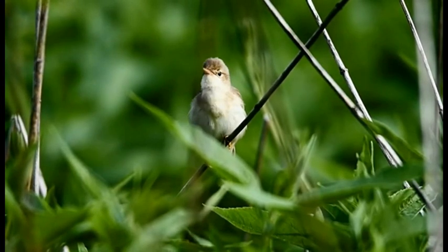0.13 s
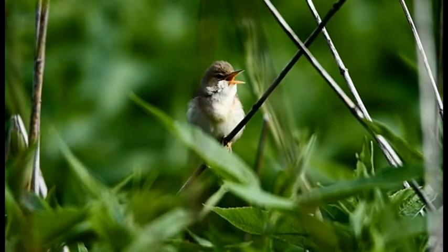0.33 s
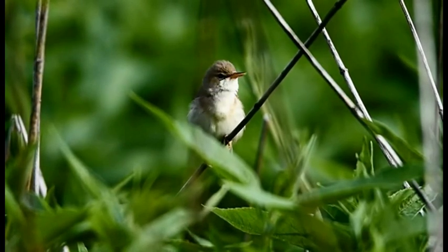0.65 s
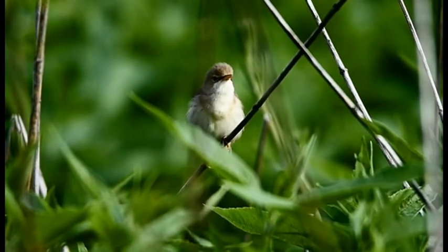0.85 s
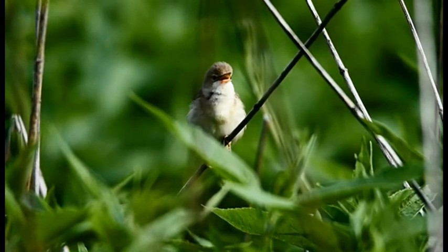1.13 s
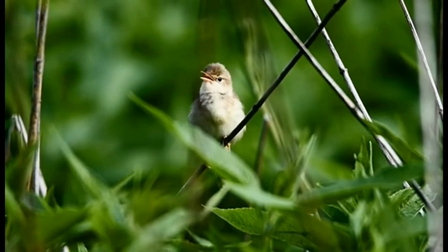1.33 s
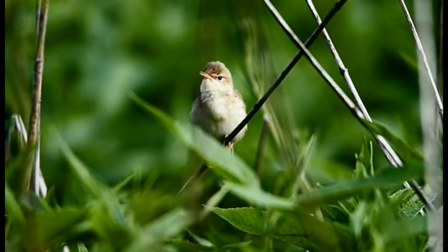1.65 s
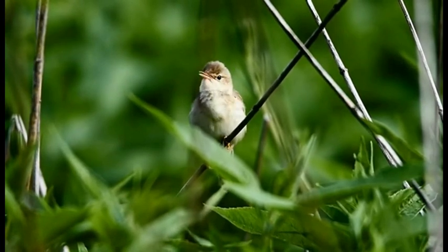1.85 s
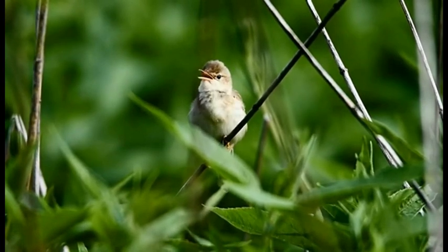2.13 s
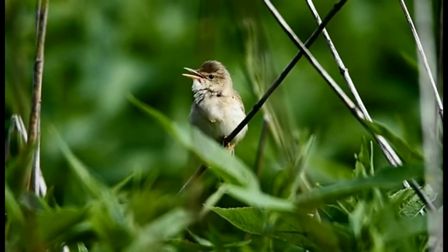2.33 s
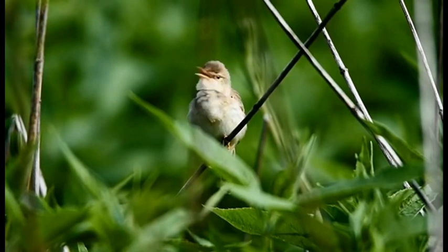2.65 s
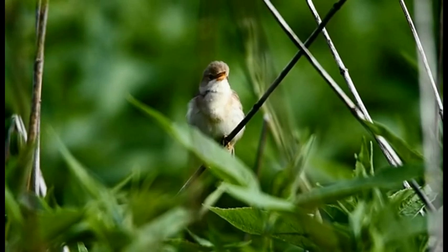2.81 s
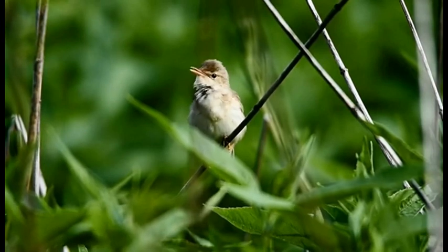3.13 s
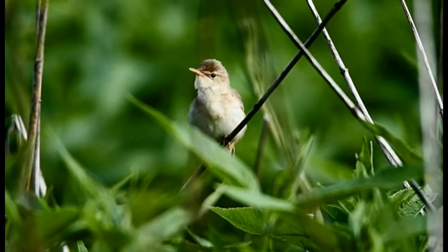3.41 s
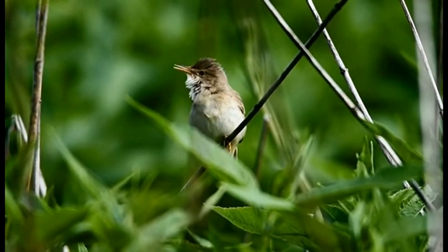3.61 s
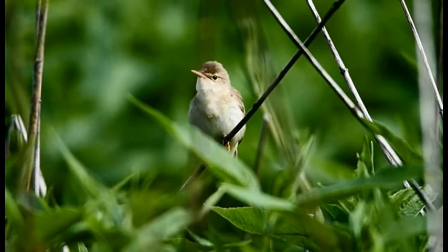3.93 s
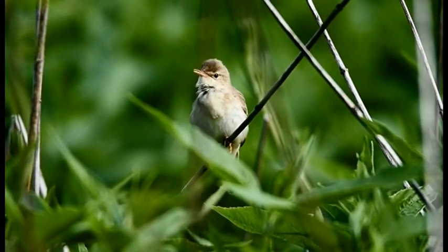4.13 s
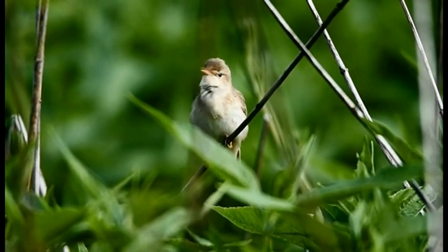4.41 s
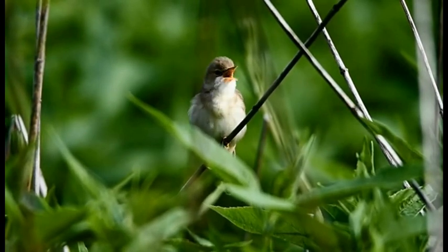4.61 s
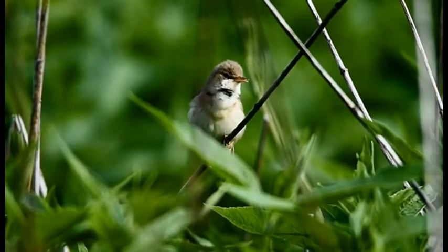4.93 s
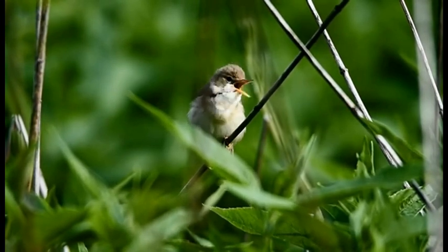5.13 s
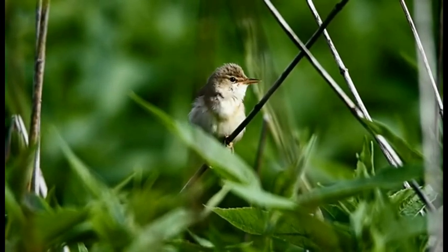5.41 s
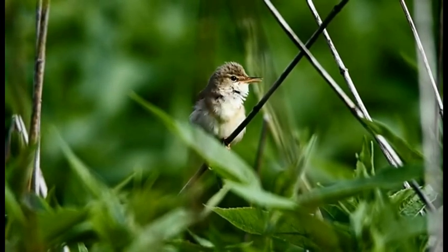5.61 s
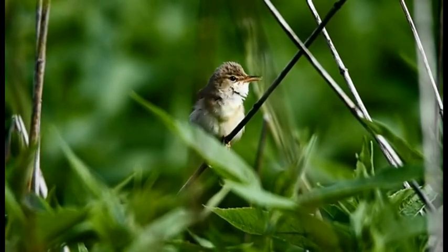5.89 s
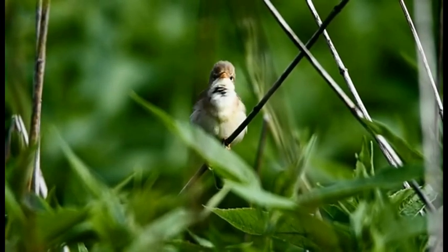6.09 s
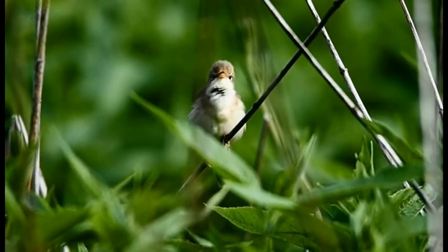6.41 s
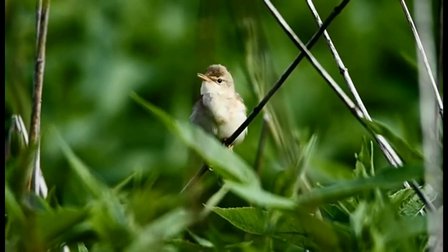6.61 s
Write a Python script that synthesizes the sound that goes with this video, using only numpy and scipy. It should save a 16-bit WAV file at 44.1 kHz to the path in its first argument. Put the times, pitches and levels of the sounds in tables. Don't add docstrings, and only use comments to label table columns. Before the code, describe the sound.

Outdoors in green undergrowth, low traffic rumble and a soft hiss of leaves lie beneath a bright warbler song. A shrill sinking trill comes first, then scooped whistles, slow at first and then in a quick run, then restless squeaks, chirps, scratchy ticks, nasal arches and hard chacks, loudest near the end. The bird is near and dry, shifting slightly in stereo as its head turns.

```python
import sys
import numpy as np
from scipy import signal
from scipy.fft import rfft, irfft
from scipy.io import wavfile
from scipy.ndimage import uniform_filter1d

SR = 44100
rng = np.random.default_rng(int(sys.argv[2]) if len(sys.argv) > 2 else 0)


def voltage_ratio(decibels):
    exponent = np.asarray(decibels, float) / 20
    return 10 ** exponent


def dump(signal):
    limited = np.clip(np.atleast_2d(signal).T, -1, 1)
    pcm = np.round(limited * 32767).astype(np.int16)
    wavfile.write(sys.argv[1], SR, pcm)


N = 297675
HZ = np.arange(N // 2 + 1) * SR / N


def walk(rate, size=N):
    hold = int(SR / rate)
    steps = rng.standard_normal(size // hold + 1)
    return 1.4 * uniform_filter1d(np.repeat(steps, hold), hold)[:size]


def colour(table):
    hz, db = np.transpose(table)
    return voltage_ratio(np.interp(np.log(HZ + 1), np.log(hz), db))


def add(out, s, x, edge_s):
    start, t = int(s * SR), np.arange(len(x)) / SR
    to_edge = np.minimum(t, t[::-1])
    fade = np.sin(np.pi / 2 * np.clip(to_edge / edge_s, 0, 1)) ** 2
    out[start:start + len(x)] += (x * fade)[:N - start]


def along(table, length):
    s, *columns = np.transpose(table)
    places = np.linspace(s[0], s[-1], int(length * SR))
    return [np.interp(places, s, column) for column in columns]


def span(table):
    return table[-1][0] - table[0][0]


# f/Hz, density/dB per Hz
FIELD = [(26, -21), (40, 0.5), (104, 0.5), (275, -16.5), (980, -15), (1500, -20), (3100, -15),
         (4700, -22.5), (6500, -25), (10700, -29)]
FIELD_DB = -47
# f/Hz, level/dB
DRONE = [(98, -62.5), (199, -66)]


def field():
    mid, side = rfft(rng.standard_normal((2, N)))
    apart = 0.94 * HZ / np.hypot(HZ, 450)
    air = irfft(colour(FIELD) * (mid + apart * side * np.array([[1], [-1]])), N)
    drone = np.zeros(N)
    for hz, db in DRONE:
        phase = 2 * np.pi * np.cumsum(hz + .07 * hz * walk(12)) / SR
        drone += voltage_ratio(db + 3.24 * walk(7.3)) * np.sin(phase)
    return voltage_ratio(FIELD_DB + .5 * walk(0.964)) * air / np.std(air) + np.sqrt(2) * drone


def reeds(x):
    t = np.arange(SR // 2) / SR
    hits = rng.standard_normal((2, len(t))) * voltage_ratio(2 * rng.standard_exponential((2, len(t))))
    cloud = voltage_ratio(-36.5 - 60 * t / 0.06) + voltage_ratio(-44.5 - 60 * t / 0.24)
    onset = np.clip(t / 0.0014, 0, 1)
    return signal.fftconvolve(x[None], hits * cloud * onset, axes=1)[:, :N]


def throat(hz, throat_hz, width):
    distance = np.log((np.abs(hz) + 1) / throat_hz) / width
    return 1 / (1 + distance ** 4) + voltage_ratio(-32.5) * (hz > throat_hz)


def rasp(out, s, length, rate_hz, throat_hz, db, glide):
    u = np.linspace(0, 1, int(length * SR))
    slow = float(rate_hz < 600)
    hz = rate_hz * (1 + glide * (u - .5)) + (40 + 90 * slow) * walk(700, len(u))
    k = np.arange(1, 14000 // rate_hz)[:, None]
    opening = throat_hz * (1 + 0.49 * glide * (1 - slow) * (u - .5))
    turns = k * np.cumsum(hz) / SR + rng.random(k.shape)
    pulses = np.sum(throat(k * hz, opening, 0.33) * np.cos(2 * np.pi * turns), axis=0)
    grit = .65 * (1 - slow) * (1 - np.sign(glide) * (u - .5)) * walk(2200, len(u))
    swell = voltage_ratio(1.1 * walk(400, len(u)) + 2.0 * slow * walk(78.4, len(u)))
    x = pulses * (swell + grit)
    add(out, s, voltage_ratio(db) * x / np.std(x), max((.26 + .1 * slow) * length, .003))


# t/s, length/s, pulse rate f/Hz, throat f/Hz, level/dB
CHURRS = [(.005, 0.045, 196.3, 2840, -48), (0.728, 0.074, 298.5, 2980, -49),
          (0.965, 0.11, 235.3, 2530, -43.5), (1.475, 0.08, 221, 2250, -46),
          (1.685, 0.029, 240.5, 2360, -48), (2.615, 0.065, 230.5, 2600, -41), (2.952, .04, 494, 3530, -34),
          (3.258, 0.27, 419.5, 3470, -50.5), (3.201, 0.069, 402, 4400, -47),
          (3.737, 0.084, 399, 4160, -44.5), (4.029, 0.1, 300, 2180, -47), (4.188, 0.11, 289.6, 2980, -46.5),
          (4.47, 0.12, 402, 4070, -45), (4.986, 0.059, 307, 2920, -48), (5.854, 0.044, 400, 3000, -39.5),
          (5.533, 0.17, 307.6, 2720, -47.5), (6.153, 0.074, 302, 3550, -50), (6.195, 0.13, 395, 4070, -56),
          (6.541, 0.057, 403, 3260, -49.5)]
# t/s, throat f/Hz, level/dB
TICKS = [
    (2.938, 5100, -30),
    (4.025, 5470, -25.5),
    (4.765, 5170, -24.5),
    (5.449, 5460, -23),
    (6.336, 5370, -23.5),
]
# t/s, throat f/Hz, level/dB
SCRAPES = [
    (1.068, 5000, -27.5),
    (1.587, 5270, -25.5),
    (1.853, 5180, -27),
    (2.036, 5000, -28),
    (2.202, 5240, -30.5),
    (2.376, 5380, -27),
    (2.555, 4880, -31),
    (2.746, 5100, -30.5),
    (4.373, 5340, -29.5),
    (6.701, 4700, -31),
]


def rasps():
    out = np.zeros(N)
    for s, length, rate_hz, throat_hz, db in CHURRS:
        rasp(out, s, length, rate_hz, throat_hz, db, glide=.3)
    for s, throat_hz, db in TICKS:
        rasp(out, s, 0.01194, 1912, throat_hz, db, glide=-0.309)
    for s, throat_hz, db in SCRAPES:
        rasp(out, s, 0.027, 1800, throat_hz, db, glide=0.3855)
    return out


# t/s, pitch f/Hz, throat f/Hz, half-pitch overtones level/dB, level/dB
BUZZ = [
    (5.25, 870, 5900, 5.5, -34),
    (5.263, 932, 5750, 4, -27.5),
    (5.291, 1040, 5630, -11, -25.5),
    (5.311, 1061, 5230, -6, -40),
    (5.398, 1087, 4550, -28, -41),
    (5.409, 910, 4200, -32, -33),
]


def buzz():
    out = np.zeros(N)
    hz, throat_hz, half_db, db = along(BUZZ, span(BUZZ))
    k = np.arange(4, 22)[:, None] / 2
    jitter = (0.0052 + 0.0186 * voltage_ratio(half_db)) * walk(600, len(hz))
    phase = 2 * np.pi * np.cumsum(hz * (1 + jitter)) / SR
    lift = throat(k * hz, throat_hz, 0.25) + voltage_ratio(-18.0) * (k < 4)
    lift = lift * np.where(k % 1, voltage_ratio(half_db), 1)
    stack = np.sum(lift * np.cos(k * phase + 3 * rng.random(k.shape)), axis=0)
    add(out, BUZZ[0][0], voltage_ratio(db + 1.8 * walk(390, len(hz))) * stack, .003)
    return out


# t/s, pitch f/Hz, level/dB
WARBLES = [
    [(4.153, 790, -48), (4.172, 990, -40), (4.191, 1113, -42), (4.214, 910, -47), (4.243, 1043, -38)],
    [(4.288, 877, -50), (4.303, 1085, -44), (4.316, 860, -44)],
    [(4.928, 846, -57), (4.945, 965, -53), (4.968, 1043, -51), (4.998, 925, -52.5), (5.012, 1003, -53)],
    [(5.595, 887, -44), (5.612, 996, -40.5), (5.634, 1125, -46), (5.662, 922, -47.5), (5.7, 1110, -44.5)],
    [(5.733, 870, -54), (5.75, 1070, -45.5), (5.763, 1093, -49)],
    [(6.473, 792, -55), (6.497, 1075, -48.5), (6.515, 1180, -49), (6.54, 913, -56.5), (6.578, 1032, -48)],
    [(6.613, 888, -56), (6.63, 983, -53), (6.642, 1060, -52)],
]
# fundamental level/dB, third level/dB, fourth level/dB, phase between capsules/rad
WARBLE_VOICE = [(-16, -12, -11, 1.5), (-11.5, -12, -11, 1), (-12.5, 5.5, -11, 0), (-14.5, -8, -14, 2.2),
                (-15, -12, -4, 4), (-6.5, -7, -27, 0), (-8, -12, -8, 0)]


def warbles():
    out = np.zeros((2, N))
    for curve, (first_db, third_db, fourth_db, turn) in zip(WARBLES, WARBLE_VOICE):
        hz, db = along(curve, span(curve))
        smooth = uniform_filter1d(hz, size=400)
        phase = 2 * np.pi * np.cumsum(smooth * (1 + .006 * walk(300, len(hz)))) / SR
        for ear, side in zip(out, (.5, -.5)):
            stack = voltage_ratio(first_db) * np.sin(phase)
            for k, overtone_db in enumerate((0, third_db, fourth_db), start=2):
                stack = stack + voltage_ratio(overtone_db) * np.sin(k * phase - side * turn)
            level = np.sqrt(2) * voltage_ratio(db + .8 * walk(200, len(hz)))
            add(ear, curve[0][0], level * stack, .004)
    return out


# multiple of half pitch, level/dB
NASAL = [(1, -18), (3, -6), (4, -9), (5, -20)]


def syrinx(hz, db, hoarse_db):
    size = len(hz)
    faint = np.clip((-39.0 - db) / 15, 0, 1)
    waver = (.004 + .003 * faint * hz / 2500) * walk(250, size)
    phase = 2 * np.pi * np.cumsum(hz * (1 + waver)) / SR
    nose = np.clip((2800 - hz) / 700, 0, 1) * (hz > 1000)
    nasal = nose * sum(voltage_ratio(g) * np.sin(k * phase / 2) for k, g in NASAL)
    octave_db = -26 + .8 * np.maximum(db + 27, 0) - 20 * faint
    tone = np.sin(phase) + voltage_ratio(octave_db) * np.sin(2 * phase) + nasal
    flutter = voltage_ratio((.9 + .5 * faint) * walk(150, size)) + voltage_ratio(hoarse_db) * walk(3500, size)
    return np.sqrt(2) * voltage_ratio(db) * flutter * tone


# t/s, length/s, start f/Hz, end f/Hz, level/dB
MURMURS = [(.155, 0.03, 5930, 4650, -59), (.178, 0.012, 1400, 1940, -50.5), (.23, 0.017, 3590, 4350, -56),
           (.34, 0.046, 4280, 4150, -48), (.67, 0.024, 4900, 3440, -55.5), (.74, 0.026, 3530, 4600, -60),
           (.815, 0.029, 5000, 6400, -52.5), (.84, 0.024, 6400, 6400, -62), (.74, 0.0083, 1800, 1840, -48),
           (1.235, 0.041, 7300, 6020, -50.5), (1.9, 0.092, 1560, 1474, -62.5),
           (3.16, 0.0092, 1520, 4540, -43), (3.295, 0.014, 1450, 1900, -59),
           (3.283, 0.0062, 3600, 1900, -53), (3.225, 0.026, 4530, 4300, -55), (3.42, 0.06, 4110, 3570, -56),
           (3.565, 0.026, 2400, 1950, -61), (3.55, 0.013, 3100, 3100, -52), (3.89, .035, 1666, 2100, -60),
           (4.26, 0.016, 2940, 2750, -44), (4.305, 0.0092, 3430, 3750, -51),
           (4.545, 0.011, 3520, 3870, -50), (4.55, 0.081, 4065, 3980, -51), (4.685, 0.043, 4420, 4500, -53),
           (4.775, 0.036, 3800, 4100, -45), (5.012, .024, 2130, 2160, -62), (5.005, 0.042, 2860, 3020, -51),
           (5.06, 0.022, 4560, 4630, -55), (5.13, 0.016, 2790, 2853, -35.5),
           (6.05, 0.0099, 3000, 3480, -47), (6.165, 0.022, 4780, 2860, -48), (6.19, 0.017, 4640, 3490, -53),
           (6.31, 0.021, 5350, 4530, -54), (6.31, 0.023, 3700, 3530, -52), (6.405, 0.04, 6700, 6550, -52.5),
           (6.55, 0.022, 4470, 4780, -53), (6.61, 0.043, 4150, 4350, -55)]
# t/s, length/s, start f/Hz, end f/Hz, level/dB
RISES = [(.235, 0.063, 4260, 4930, -50), (.344, 0.013, 4730, 5930, -39.5), (.35, 0.022, 5750, 6900, -32),
         (.347, 0.0257, 2940, 3420, -39.5), (.37, 0.013, 3340, 3960, -32.5), (.379, .011, 3800, 5770, -34),
         (.388, 0.014, 5800, 6760, -39), (.768, 0.046, 4660, 5180, -49.5),
         (1.225, 0.067, 4560, 6040, -48.5), (3.185, .014, 4210, 4280, -37), (3.359, 0.014, 3020, 3280, -32),
         (3.295, 0.014, 2880, 3500, -44), (3.755, .021, 1490, 2270, -49),
         (3.619, 0.0088, 1450, 2250, -45.5), (3.623, 0.0099, 2880, 5980, -49.5),
         (3.657, .016, 4240, 4970, -40), (3.85, 0.029, 5820, 6470, -51), (3.886, 0.05, 3144, 3195, -48.5),
         (4.205, 0.067, 5880, 6600, -53.5), (4.241, 0.026, 1980, 2250, -51), (6.572, .012, 3050, 3730, -52),
         (4.482, 0.012, 2040, 2990, -38.5), (4.512, .009, 4160, 4650, -41), (4.519, 0.011, 4610, 4770, -33),
         (4.529, 0.0052, 4750, 5700, -40), (4.642, 0.024, 3100, 5200, -43), (4.646, 0.036, 1790, 2770, -44),
         (4.87, 0.053, 2830, 3200, -52.5), (5.103, .016, 3230, 4600, -48),
         (5.117, 0.019, 4770, 5700, -43.5), (5.106, 0.04, 1863, 3180, -43.5),
         (6.122, 0.04, 2870, 5000, -45.5), (6.126, 0.037, 1752, 2500, -44)]
# t/s, length/s, start f/Hz, end f/Hz, level/dB
DROPS = [(.192, 0.0252, 2310, 1980, -41.5), (.29, 0.063, 2930, 2800, -50.5), (.296, 0.042, 4440, 4250, -46),
         (1.693, 0.034, 3290, 3050, -49.5), (2.04, 0.034, 2096, 1966, -53.5),
         (2.255, .14, 2965, 2774, -46.5), (3.054, 0.013, 5830, 5600, -33.5),
         (3.066, .02, 5600, 4520, -32.5), (3.084, 0.0124, 4600, 4400, -27),
         (3.094, .012, 4410, 3310, -30.5), (3.172, 0.017, 5420, 4200, -41.5),
         (3.216, 0.0086, 3750, 2650, -34), (3.221, 0.0082, 2420, 1920, -46),
         (3.273, 0.0073, 4010, 2780, -35), (3.281, 0.0066, 3610, 2800, -35),
         (3.199, 0.013, 4700, 4400, -35.5), (4.378, 0.0077, 4920, 4130, -24.5),
         (4.388, .013, 3710, 2900, -37.5), (3.493, 0.057, 3380, 3060, -48), (3.632, 0.019, 5800, 4440, -52),
         (3.648, 0.01, 4440, 4140, -39), (3.815, 0.033, 3700, 3010, -49), (3.872, 0.032, 5450, 4970, -50),
         (4.106, 0.038, 4620, 4020, -50.5), (4.133, .03, 4030, 3850, -52), (4.497, 0.0162, 5120, 4100, -45),
         (5.066, 0.012, 3570, 2720, -40), (5.076, 0.023, 2200, 1750, -45.5),
         (5.965, 0.023, 5400, 3870, -48.5), (6.16, 0.017, 3915, 3750, -49), (5.19, 0.19, 3300, 3110, -53),
         (5.69, .038, 4980, 4250, -53.5), (6.08, 0.053, 7030, 6480, -53.5),
         (6.085, 0.018, 2385, 1810, -44.5), (6.365, 0.045, 4680, 4820, -50),
         (6.611, 0.032, 2794, 2960, -46), (6.645, 0.05, 2890, 2760, -46)]
# t/s, length/s, middle f/Hz, ends f/Hz, level/dB
BENDS = [(1.89, .17, 3170, 3010, -47), (3.003, .026, 3480, 3540, -49), (3.033, .022, 3850, 3950, -49),
         (3.233, .04, 2900, 3000, -50), (3.394, .013, 2800, 3120, -37), (3.644, .024, 2110, 2060, -48.5),
         (3.73, .013, 4450, 2900, -36), (3.815, .03, 2250, 1950, -51), (3.962, .061, 3700, 3850, -51),
         (4.108, .016, 1880, 2050, -49), (4.652, .016, 507, 470, -56), (5.549, .014, 2200, 2080, -51),
         (5.657, .012, 3900, 4110, -53), (5.972, .029, 1880, 2320, -50), (5.984, .015, 3760, 3900, -42)]
# t/s, pitch f/Hz, level/dB
PIPS = [(0.178, 1610, -55), (.762, 2363, -40), (2.206, 2105, -55), (3.183, 2195, -50), (3.428, 2350, -53),
        (3.463, 1890, -48.5), (3.851, 1815, -46), (4.502, 2130, -46), (4.607, 1984, -45),
        (4.78, 2030, -52.5), (6.161, 2134, -42.5), (6.196, 1885, -45), (6.23, 1824, -47)]
# t/s, start f/Hz, end f/Hz, level/dB
FLICKS = [(2.206, 3730, 3120, -33.5), (3.166, 3060, 2890, -33), (3.741, 3030, 2850, -39.5),
          (3.805, 3950, 3790, -34), (6.175, 2850, 2760, -43), (6.685, 2880, 2870, -38),
          (3.315, 2650, 3500, -31.5), (3.332, 5400, 5960, -46), (3.334, 2700, 3300, -34.5),
          (3.343, 3940, 5140, -33.5), (3.361, 5680, 6360, -46), (3.38, 4560, 4880, -37),
          (3.395, 5540, 5900, -47), (3.412, 3550, 4220, -34.5), (3.448, 2820, 3370, -41.5),
          (3.63, 2730, 3000, -34), (3.677, 4940, 2470, -34.5), (3.776, 2790, 3890, -36.5),
          (3.79, 2760, 2990, -36), (4.483, 3500, 5400, -44.5), (4.519, 5560, 5450, -49),
          (4.534, 5480, 2570, -36), (4.598, 4170, 2600, -39), (6.197, 3520, 3960, -48),
          (5.401, 4760, 3620, -56), (5.956, 1750, 3220, -41.5), (5.997, 3870, 4420, -36.5),
          (6.015, 4470, 2160, -34), (6.09, 4230, 3240, -49)]
FLICK_S, PIP_S = .0105, 0.014
COO_S, COO_LENGTH_S, COO_HZ, COO_DB = .012, .14, 560, -60.5


def notes():
    listed = [(COO_S, COO_LENGTH_S, COO_HZ, .96 * COO_HZ, 0, COO_DB)]
    for s, length, a, b, db in list(MURMURS) + list(RISES) + list(DROPS):
        listed.append((s, length, a, b, 0, db))
    for s, length, middle, ends, db in BENDS:
        listed.append((s, length, ends, ends, middle - ends, db))
    for s, hz, db in PIPS:
        listed.append((s, PIP_S, hz, hz, 0, db))
    for s, a, b, db in FLICKS:
        listed.append((s, FLICK_S, a, b, 0, db))
    return listed


HIDDEN_DB, HIDDEN_WET_DB = -43, -5


def short_notes():
    out, hidden = np.zeros((2, N))
    for s, length, a, b, bulge, db in notes():
        u = np.linspace(0, 1, int(length * SR))
        hz = a + (b - a) * u + bulge * (1 - (2 * u - 1) ** 2)
        add(hidden if db < HIDDEN_DB else out, s, syrinx(hz, db, -11.5), min(.15 * length, .01))
    return out, hidden


# t/s, length/s, level/dB
CHACKS = [
    (3.085, 0.033, -22),
    (4.37, 0.036, -22.5),
    (5.826, .03, -15.5),
    (6.693, 0.03, -15),
]
# share of length, pitch f/Hz, level/dB
FALL = [
    (0, 6984, -18),
    (.22, 7280, -5.5),
    (.36, 5695, 0),
    (.47, 5736, -4),
    (.58, 4310, -4.5),
    (.68, 5165, -13),
    (.8, 3450, -11.5),
    (.9, 4044, -17),
    (1.15, 2790, -16),
]


def chacks():
    out = np.zeros(N)
    for s, length, db in CHACKS:
        hz, shape_db = along(FALL, length * FALL[-1][0])
        add(out, s, syrinx(uniform_filter1d(hz, size=40), db + shape_db, -12), .002)
    return out


# t/s, centre f/Hz, swing f/Hz, level/dB
TRILL = [
    (.398, 6700, 300, -36),
    (.42, 6500, 650, -28),
    (.455, 6220, 700, -24),
    (.487, 5760, 606, -29.5),
    (.52, 5250, 360, -30),
    (.571, 4720, 270, -32.5),
    (.608, 4320, 260, -35),
    (.619, 3820, 200, -52),
]
# t/s, swings done
SWINGS = [(.398, -1), (.427, 1), (.4705, 4), (.553, 9), (.619, 12.8)]
STRAIN_HZ, STRAIN_STEP_HZ = 5700, 300


def trill():
    out = np.zeros(N)
    length = span(SWINGS)
    centre, swing, db = along(TRILL, length)
    hz = centre - swing * np.cos(2 * np.pi * along(SWINGS, length)[0])
    strain_db = (np.maximum(hz - STRAIN_HZ, 0) / STRAIN_STEP_HZ) ** 2
    add(out, SWINGS[0][0], syrinx(hz, db - strain_db, -17), .003)
    return out


# delay t/s, length/s, start f/Hz, end f/Hz, level against scrape/dB
ZIPS = [
    (.005, .022, 3712, 6936, -9),
    (.008, 0.0113, 3420, 4330, -7.5),
]


def zips():
    out = np.zeros(N)
    for s, _, db in SCRAPES[:len(TWEETS)]:
        for delay, length, a, b, zip_db in ZIPS:
            left = np.linspace(1, 0, int(length * SR))
            add(out, s + delay, syrinx(b + (a - b) * left ** 2, db + zip_db, -15), .003)
    return out


# share of the time to the snap, share of held pitch, level/dB
SCOOP = [(0, .74, -6), (.3, .8, -1), (.8, .85, 0), (1, .94, -5)]
SETTLE_S, SAG_DB, SAG_S = 0.0296, -4, 0.058
RELEASE_S, RELEASE_DROP, RELEASE_DB = 0.028, 0.051, -11


def tweet(length, snap_s, held_hz, db):
    t = np.arange(int(length * SR)) / SR
    share, pitch, scoop_db = np.transpose(SCOOP)
    after = np.maximum(t - snap_s, 0)
    end = np.clip(1 - (length - t) / RELEASE_S, 0, 1)
    settle = (1 - pitch[-1]) * (1 - np.exp(-after / SETTLE_S))
    hz = held_hz * (np.interp(t / snap_s, share, pitch) + settle - RELEASE_DROP * end ** 2)
    sag_db = SAG_DB * (1 - np.exp(-after / SAG_S))
    return hz, db + np.interp(t / snap_s, share, scoop_db) + sag_db + RELEASE_DB * end


# t/s, length/s, snap after t/s, held f/Hz, level/dB
TWEETS = [
    (1.091, 0.38, 0.023, 4480, -26),
    (1.605, 0.17, 0.026, 4318, -24.5),
    (1.868, 0.12, 0.027, 4342, -25),
    (2.052, 0.12, 0.036, 4267, -26.5),
    (2.219, 0.12, 0.025, 4313, -23.5),
    (2.39, 0.1, 0.027, 4500, -22.5),
    (2.567, 0.12, 0.031, 4186, -27),
    (2.759, 0.11, 0.042, 4270, -25),
]


def tweets():
    out = np.zeros(N)
    for s, *shape in TWEETS:
        add(out, s, syrinx(*tweet(*shape), -23), .003)
    return out


# t/s, left minus right level/dB
HEAD = [
    (0, -4.5),
    (1.5, 0.5),
    (3.3, -1.5),
    (6.75, -1.5),
]


def head_turn():
    return voltage_ratio(along(HEAD, N / SR)[0] * np.array([[.5], [-.5]]))


# f/Hz, left minus right level/dB
EARS = [(300, -0.5), (1100, 3), (2000, 1), (3600, 4.5), (4400, 3), (5200, -5.5), (6400, -8.5), (8500, 4)]
# f/Hz, left lag/rad
LAGS = [(300, 0), (1100, 1.1), (1900, .9), (2900, -.5), (3600, .2), (4400, .7), (5300, .4), (6400, -1),
        (9000, -.8)]


def capsules():
    lag = np.exp(-.5j * np.interp(HZ, *np.transpose(LAGS)))
    left = np.sqrt(colour(EARS)) * lag
    return np.array([left, 1 / left])


# f/Hz, width f/Hz, depth 0-1
NOTCHES = [(2590, 450, .8), (7750, 1200, .98)]


def housing():
    gain = np.ones(len(HZ))
    for hz, width, depth in NOTCHES:
        gain *= 1 - np.clip(depth, 0, 1) / (1 + (2 * (HZ - hz) / width) ** 2)
    return gain


def gain_control(bird):
    loudness = np.sqrt(np.abs(uniform_filter1d(bird ** 2, size=5000, origin=2300)))
    return 1 / (1 + loudness / voltage_ratio(-33))


def scene():
    leaves = field()
    low = signal.sosfilt(signal.butter(2, 1300, fs=SR, output="sos"), leaves)
    strokes, hidden = short_notes()
    bird = strokes + hidden + chacks() + trill() + zips() + tweets() + rasps() + buzz()
    arches = warbles()
    echoes = reeds(bird + arches[0] + voltage_ratio(HIDDEN_WET_DB) * hidden)
    sung = bird + arches + echoes
    air = rfft(sung * head_turn() + low) * capsules()
    air = air + rfft(gain_control(bird) * (leaves - low))
    return irfft(air * housing(), N)


def band_limit(x):
    return signal.sosfilt(signal.butter(12, 12140, fs=SR, output="sos"), x)


def record(dry):
    top = signal.ellip(10, .3, 60, 11050, fs=SR, output="sos")
    mix = signal.sosfilt(top, dry)
    return band_limit(mix)


dry = scene()
out = record(dry)
dump(out)
```